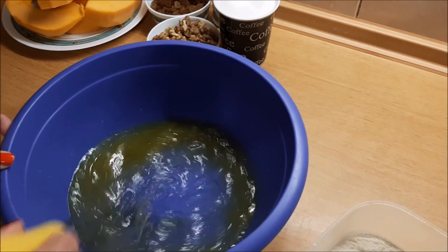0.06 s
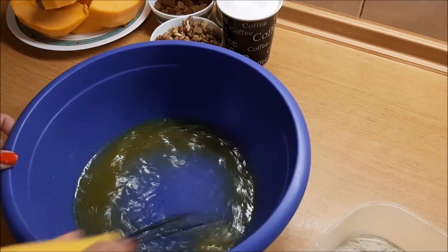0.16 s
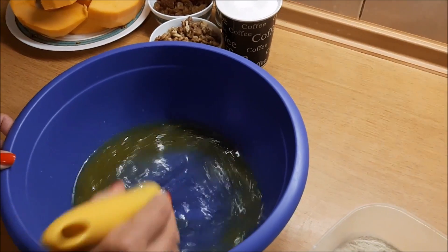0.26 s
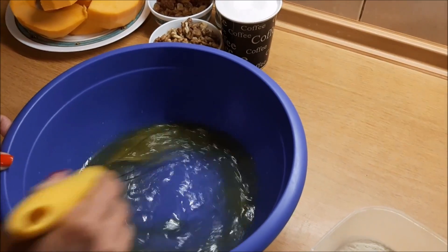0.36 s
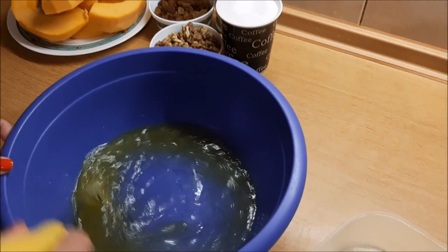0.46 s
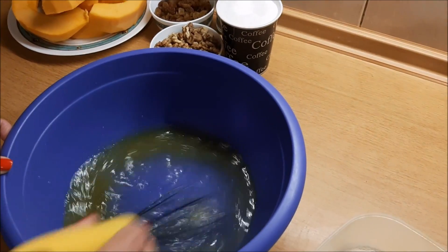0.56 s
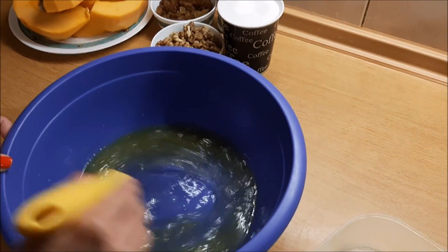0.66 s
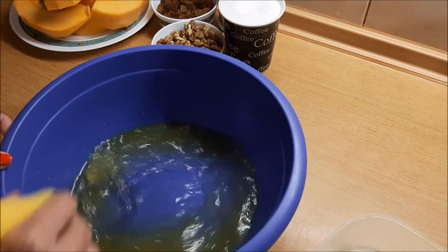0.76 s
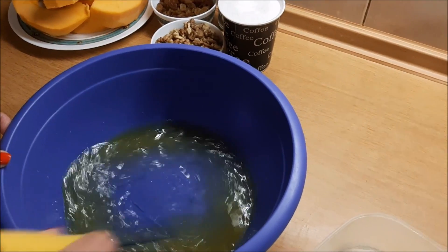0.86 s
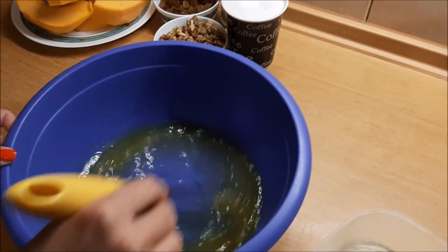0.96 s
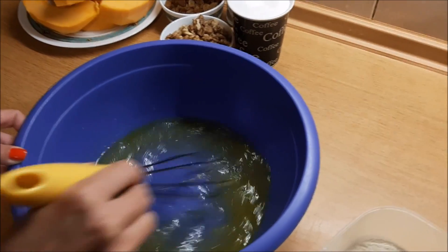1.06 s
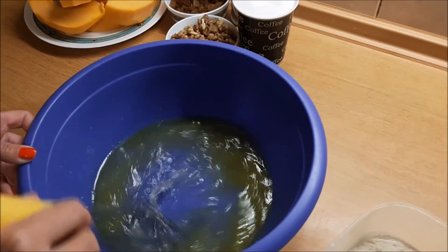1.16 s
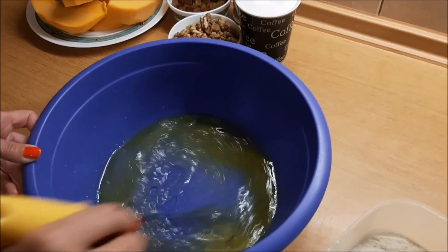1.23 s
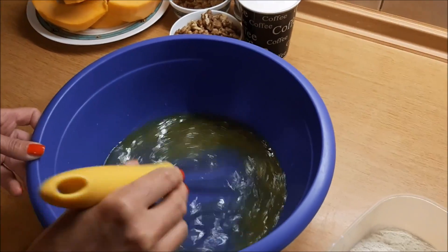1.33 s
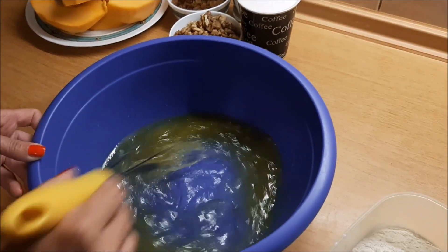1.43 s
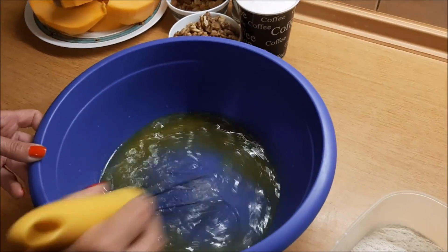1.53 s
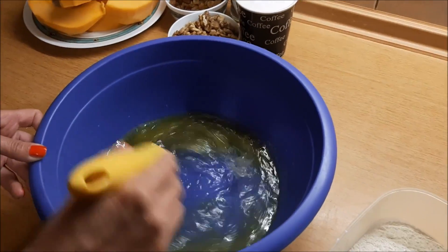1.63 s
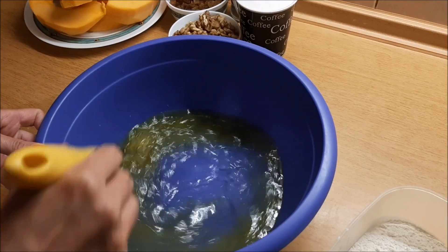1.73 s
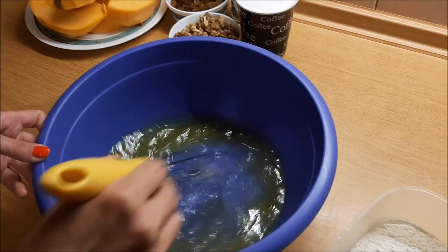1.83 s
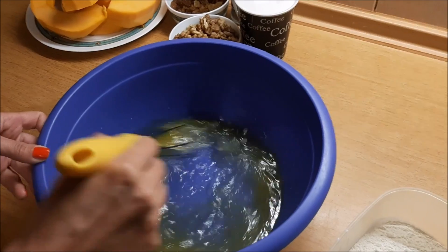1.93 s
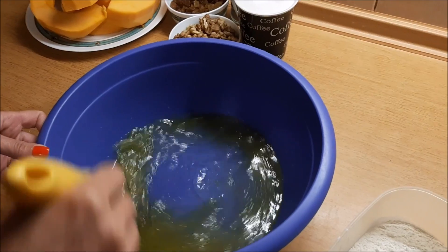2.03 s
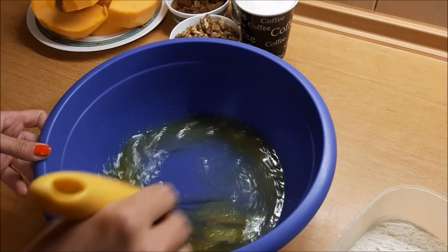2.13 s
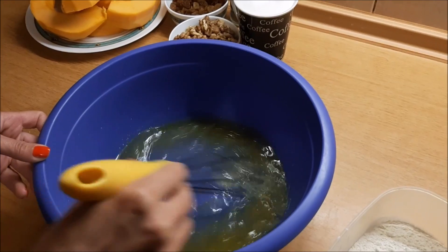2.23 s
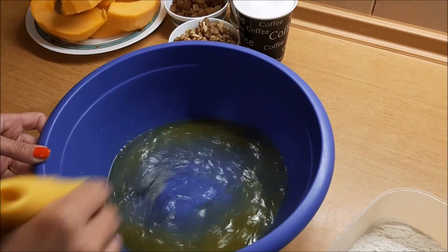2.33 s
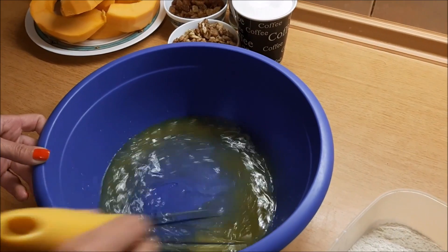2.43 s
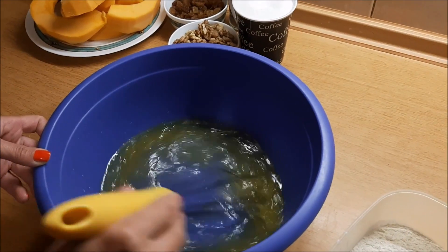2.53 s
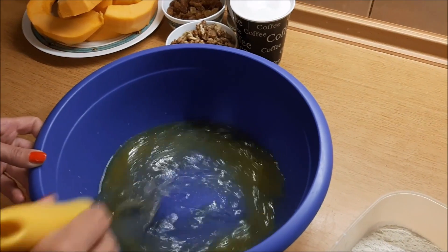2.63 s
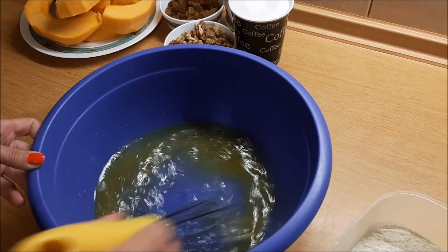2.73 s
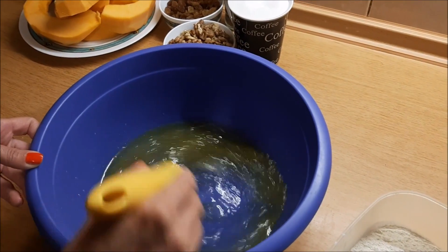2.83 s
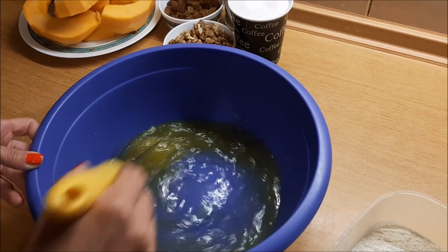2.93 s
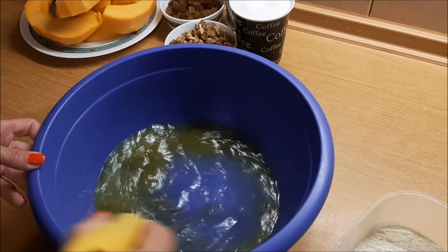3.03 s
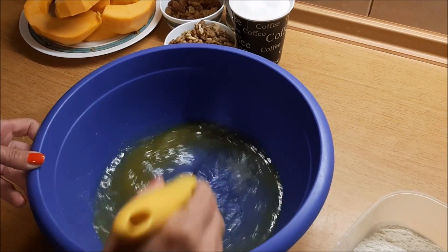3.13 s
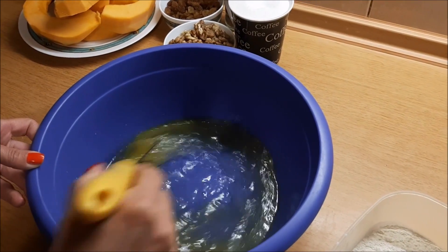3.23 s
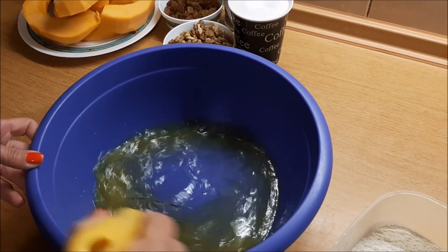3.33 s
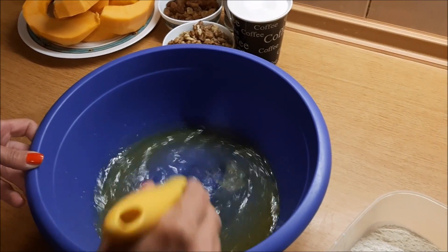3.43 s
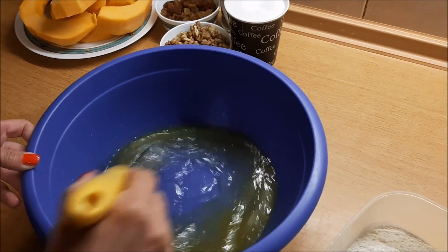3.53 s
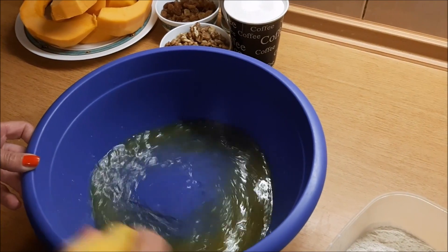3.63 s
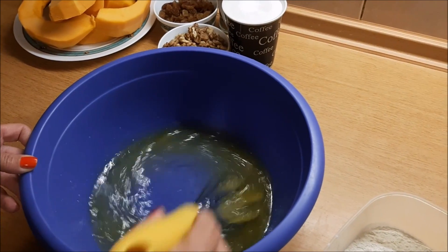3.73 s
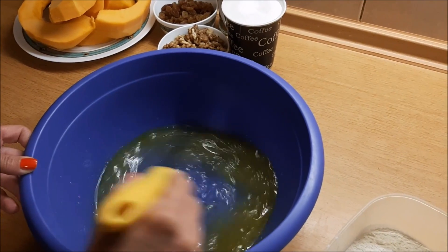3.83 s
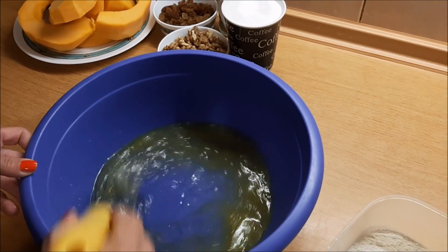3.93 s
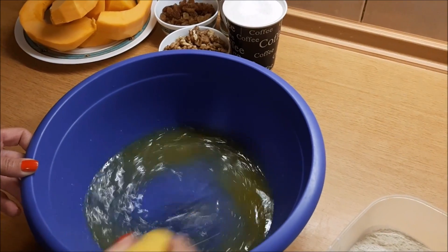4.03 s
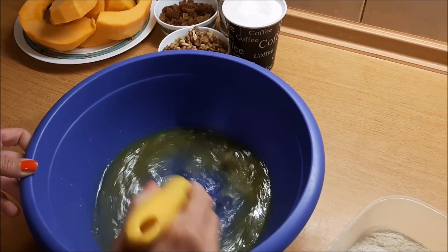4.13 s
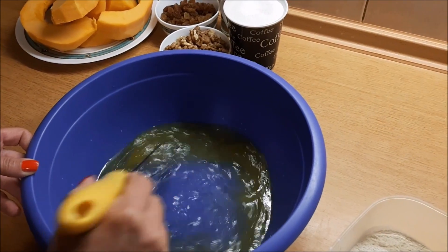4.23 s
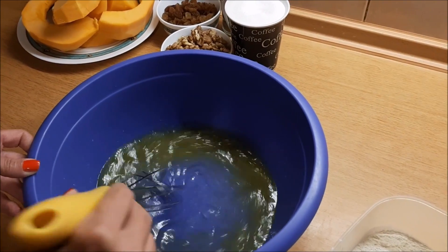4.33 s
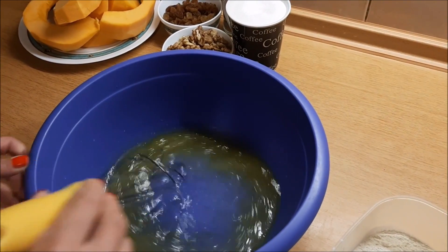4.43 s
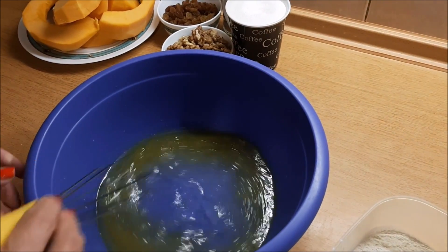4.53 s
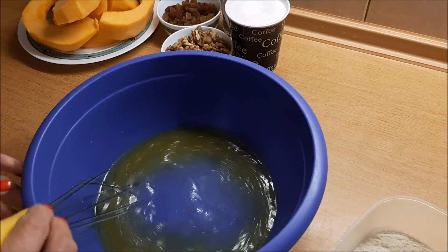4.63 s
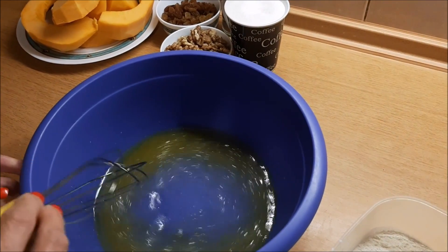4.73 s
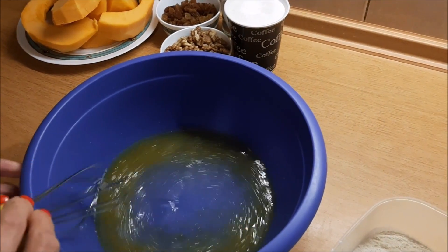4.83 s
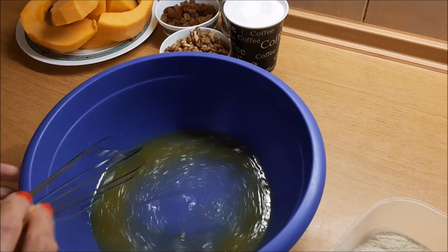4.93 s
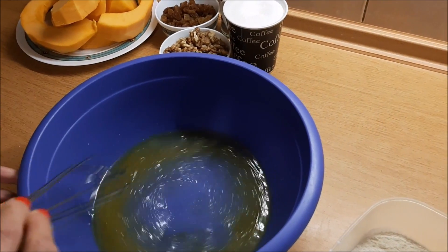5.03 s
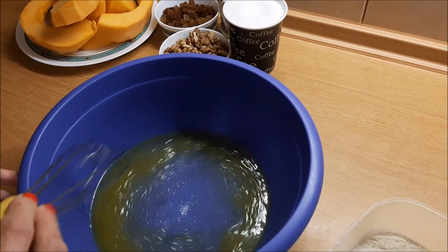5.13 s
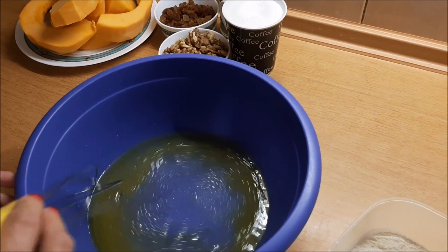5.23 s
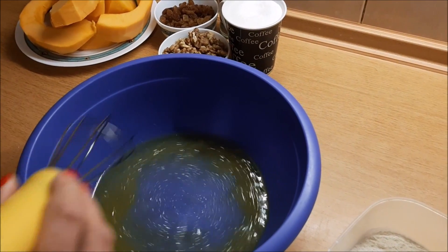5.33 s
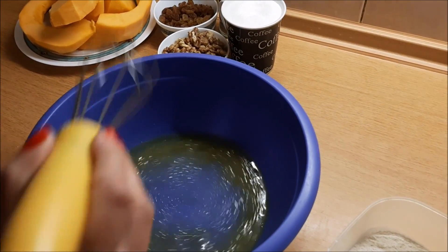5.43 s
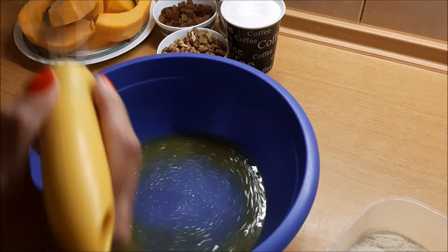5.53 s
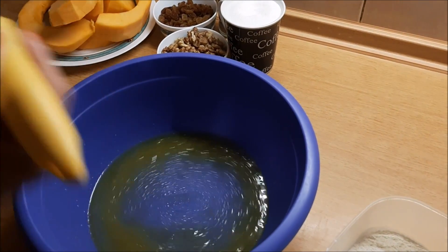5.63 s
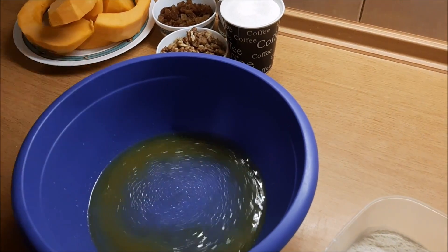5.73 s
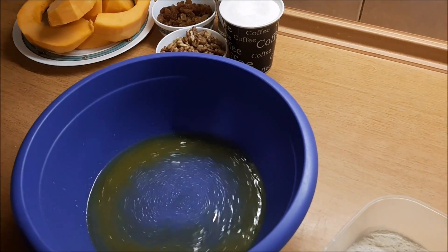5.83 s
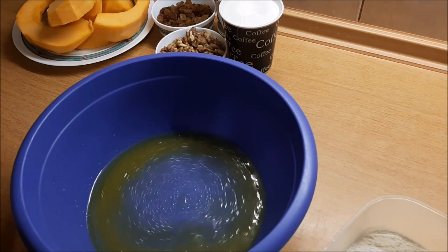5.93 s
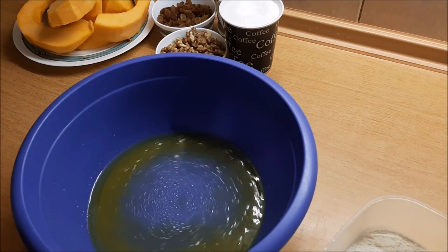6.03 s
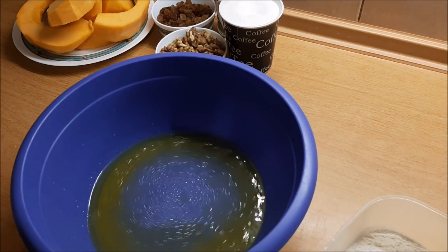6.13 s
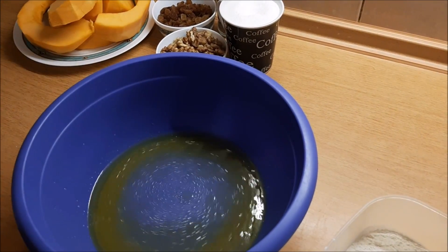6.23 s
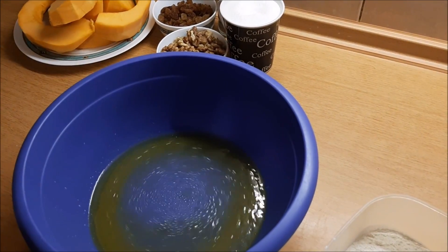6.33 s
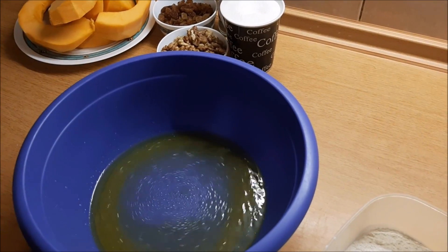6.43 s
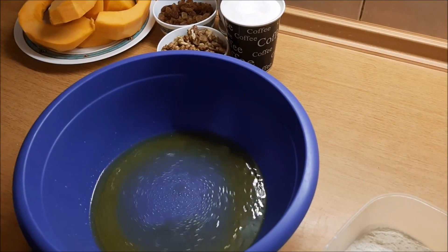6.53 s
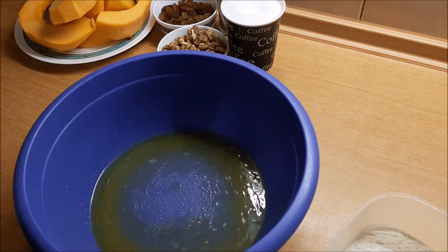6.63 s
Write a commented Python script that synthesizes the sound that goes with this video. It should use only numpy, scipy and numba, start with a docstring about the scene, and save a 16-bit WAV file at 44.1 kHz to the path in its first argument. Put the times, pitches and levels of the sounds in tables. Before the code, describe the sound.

A wire whisk rapidly beats thin egg in a plastic bowl, wires clacking on the wall, then four taps on the rim and soft set-down bumps.

```python
"""Whisk in a plastic bowl

A wire whisk beats a thin egg mixture on a kitchen worktop, heard close up: sprays of short damped sines give
tearing films and bubbles, stick-slip grains excite the bowl's modes, and noise bursts and modes give knocks.
The whisk is then tapped four times on the rim and set aside with a rustle, wire notes and soft bumps.
Close reflections and a small room's tail surround it all; low noise and a faint mains hum remain."""
import sys
import numpy as np
from scipy import signal
from scipy.fft import rfft, irfft
from scipy.io import wavfile
from scipy.ndimage import uniform_filter1d
from numba import njit

SR = 44100
rng = np.random.default_rng(int(sys.argv[2]) if len(sys.argv) > 2 else 0)


def inscribe(sig):
    """Save sig as 16-bit PCM at rate SR to the path in sys.argv[1].

    A 1-D sig is mono; a 2-D sig holds one channel per row.
    Samples are clipped to [-1, 1] before scaling.
    """
    pcm = np.round(np.clip(np.atleast_2d(sig).T, -1, 1) * 32767)
    wavfile.write(sys.argv[1], SR, pcm.astype(np.int16))


N = 294147
TIME = np.arange(N) / SR


def undb(db):
    """Level law: decibels to amplitude gain."""
    return 10 ** (np.asarray(db) / 20)


def unit(x):
    """Normalisation: scale to rms 1."""
    return x / np.sqrt(np.mean(x ** 2))


def add(out, s, sound):
    """Superposition: mix a sound in at time s in seconds."""
    start = int(s * SR)
    out[:, start:start + sound.shape[1]] += sound[:, :N - start]


def convolve(x, response):
    """Linear filtering: pass a stereo sound through an impulse response."""
    return signal.fftconvolve(x, np.atleast_2d(response), axes=1)[:, :x.shape[1]]


def band_pass(x, low_hz, high_hz, order=2):
    """Band-pass filtering: keep the range between two frequencies."""
    return signal.sosfilt(signal.butter(order, (low_hz, high_hz), "band", fs=SR, output="sos"), x)


def high_pass(x, low_hz, order):
    """High-pass filtering: keep what lies above one frequency."""
    return signal.sosfilt(signal.butter(order, low_hz, "high", fs=SR, output="sos"), x)


def log_bins(count):
    """Logarithmic pitch scale: log frequency of each spectrum bin."""
    return np.log(np.fft.rfftfreq(count, 1 / SR) + 1)


def colour(x, points, size=4096):
    """Minimum-phase filtering: a causal filter of the given (Hz, dB) shape, by way of the cepstrum."""
    hz, db = np.transpose(points)
    log_gain = np.log(undb(np.interp(log_bins(size), np.log(hz), db)))
    cepstrum = irfft(log_gain)[:size // 2]
    cepstrum[1:] *= 2
    return convolve(x, irfft(np.exp(rfft(cepstrum, size))))


def fade(t, t60):
    """Exponential decay: from t = 0, falling 60 dB in t60 seconds."""
    return (t >= 0) * np.exp(-np.log(1000) * np.abs(t) / t60)


def noise(count, apart_hz=1150):
    """Interchannel coherence: white stereo noise, alike in the bass and unrelated in the treble."""
    mid, side = rfft(rng.standard_normal((2, count)))
    likeness = .93 / (1 + (np.fft.rfftfreq(count, 1 / SR) / apart_hz) ** 3)
    opposed = np.array([[1], [-1]]) * side
    return unit(irfft(mid * np.sqrt(1 + likeness) + opposed * np.sqrt(1 - likeness), count))


def ring(modes, t, width_hz=1300, uneven_db=4.0):
    """Modal synthesis: damped sines, unevenly excited; the channels go out of step with rising pitch."""
    out = 0
    for hz, db, t60 in modes:
        side = rng.choice([-1, 1]) * np.array([[1], [-1]])
        skew = side * min(hz / width_hz, 1) ** 2 * np.pi / 4
        detune = 1 + 0.0058 * rng.standard_normal()
        phase = 2 * np.pi * (hz * t * detune + rng.random())
        level = undb(db + uneven_db * rng.uniform(-2.2, 1))
        out = out + level * fade(t, t60) * np.sin(phase + skew)
    return out


@njit
def ping(starts, hz, cycles, sizes, glide):
    """Granular synthesis: one softly started damped sine per grain, rising in pitch by the share glide."""
    out = np.zeros(N)
    for k in range(len(hz)):
        length, first = cycles[k] * SR / hz[k], int(starts[k]) + 1
        step = 2 * np.pi * hz[k] / SR
        phase = step * (first - starts[k])  # starts fall between samples
        for i in range(min(int(length), N - first)):
            envelope = min(12 * (i + 1) / length, 1.) * np.exp(-5.8 * i / length)
            out[first + i] += sizes[k] * envelope * np.sin(phase)
            phase += step * (1 + glide * i / length)
    return out


def grains(rate, low_hz, high_hz, cycles, scatter_db, glide, lag_s):
    """Stochastic grain shower: rate per second, random pitch, life and size, each with its channel lag."""
    when, pitch, life, size, place = rng.random((int(rate * N / SR), 5)).T
    starts = (np.arange(len(when)) + 2 * when) * SR / rate
    sizes = undb(-scatter_db * np.log(size + .015))
    lag = (2 * place - 1) * lag_s * SR / 2
    hz = low_hz * (high_hz / low_hz) ** pitch
    lives = cycles * (.5 + life)
    return unit(np.array([ping(np.abs(starts + way * lag), hz, lives, sizes, float(glide)) for way in (-1, 1)]))


def flutter(rate, depth_db):
    """Amplitude modulation: a gain wandering between random values, rate of them per second."""
    steps = rng.standard_normal(2048)
    return undb(depth_db * np.interp(TIME * rate, np.arange(len(steps)), steps))


def waver(x, rate, shift_s):
    """Doppler shift: a drifting delay moves the resonances up and down, as when liquid climbs the wall."""
    wander = np.log(flutter(rate, 20 / np.log(10)))  # the random values themselves, without the gain law
    drift = uniform_filter1d(wander, SR // 30)
    return np.array([np.interp(TIME + shift_s * drift, TIME, channel) for channel in x])


def hollow(x, echo_db=1, t60=0.028):
    """Cavity reverberation: dense echoes in the bowl, their resonances shifted by moving hand and liquid."""
    t = TIME[:SR // 10]
    echoes = unit(noise(len(t)) * fade(t - .001, t60)) / np.sqrt(len(t))
    inside = waver(convolve(x, echoes), rate=4, shift_s=.002)
    return (x + undb(echo_db) * inside) / np.hypot(1, undb(echo_db))


def favour(x, hz, db, q=7):
    """Resonance: lift one narrow band."""
    return x + (undb(db) - 1) * signal.lfilter(*signal.iirpeak(hz, q, fs=SR), x)


# Spectrum of the room noise; its base level in dB is set by quiet(). Each row of the spectrum: frequency in Hz,
# relative level in dB.
QUIET_NOISE = [(15, -53.5), (25, -26.5), (64, -26.5), (97, -2.5), (166, -20), (200, -0.5), (223, -15.5),
               (344, -18), (384, -18.5), (775, -38), (1890, -36), (16000, -42)]
# Partials of the mains hum. Each row: frequency in Hz, rms level in dB.
HUM = [(99, -76), (200, -82.5), (300, -82)]


def quiet(noise_db=-67):
    """Stationary background: filtered low room noise plus the steady sines of an appliance's hum."""
    hum = 0
    for hz, db in HUM:
        hum = hum + np.sqrt(2) * undb(db) * np.sin(2 * np.pi * (hz * TIME + rng.random()))
    return hum + unit(colour(noise(N), QUIET_NOISE)) * undb(noise_db)


# Reverberation time of the room. Each row: frequency in Hz, 60 dB decay time in seconds.
ROOM_T60 = [(100, 0.3), (500, 0.52), (2000, 0.59), (6000, 0.43), (14000, 0.26)]


def kitchen(dry, early_db=-11, late_db=-13):
    """Room reverberation: close reflections from bowl and worktop, then the tail of a small tiled room."""
    t = TIME[:SR * 3 // 5]
    hz, t60 = np.transpose(ROOM_T60)
    spectrum, log_hz = rfft(noise(len(t))), log_bins(len(t))
    late = 0
    for share, decay in zip(np.eye(len(hz)), t60):  # each band dies at its own pace
        band = irfft(spectrum * np.interp(log_hz, np.log(hz), share), len(t))
        late = late + band * fade(t - .012, decay)
    early = noise(len(t)) * fade(t - .002, t60=0.074)
    return convolve(dry, (undb(early_db) * unit(early) + undb(late_db) * unit(late)) / np.sqrt(len(t)))


# The whisk sliding as it is set aside. Each row: start in seconds, length in seconds, relative level in dB.
SLIDES = [(6.025, 0.08, -71.5), (6.162, 0.028, -65), (6.228, 0.27, -77), (6.495, 0.21, -53.5)]


def sliding(attack_s=0.018, release_t60=0.25):
    """Envelope shaping: each slide starts quickly, holds and dies away."""
    gain = 0
    for s, length, db in SLIDES:
        attack = np.clip((TIME - s) / attack_s, 0, 1)
        gain = gain + undb(db) * attack * fade(np.maximum(TIME - s - length, 0), release_t60)
    return gain


def squeak(hz, db, t, width=0.05):
    """Narrow-band friction noise: a rubbed wire gives a short, rough note."""
    note = band_pass(noise(len(t)), hz * (1 - width), hz * (1 + width))
    return undb(db) * unit(note) * fade(t, t60=0.14)


# Modes of the free wire loops. Each row: frequency in Hz, relative level in dB, 60 dB decay time in seconds.
WIRES = [(1335, -2.5, 0.18), (1370, -4, 0.17), (1464, -3.5, .18), (1670, -1, 0.27), (1780, -11.5, 0.34),
         (1870, -6, .35), (1930, -3, 0.2), (2062, -4.5, 0.24), (2070, -4, 0.31), (2400, -2.5, 0.15),
         (2790, -7.5, 0.091), (3150, -9.5, 0.14), (3490, -7.5, 0.092), (3784, -10.5, 0.089),
         (4100, -11.5, 0.076), (4755, -15, 0.067), (4950, -14.5, 0.046), (5570, -16, 0.1)]
# Modes of the worktop under the whisk. Each row: frequency in Hz, relative level in dB, decay time in seconds.
WORKTOP = [(352, 0, 0.1), (770, 3.5, 0.068), (1090, 0.5, 0.066), (1630, -3, .14), (1936, 1.5, 0.11),
           (3340, -19, 0.13)]
# Spectrum of the sliding rub. Each row: frequency in Hz, relative level in dB.
SLIDE_COLOUR = [(120, -34), (200, -12), (334, -6.5), (590, -12), (777, -11), (1400, -13), (1650, -9.5),
                (2130, -8.5), (11700, -20), (16000, -24)]
# Spectrum of a bump. Each row: frequency in Hz, relative level in dB.
BUMP_COLOUR = [(35, -42.5), (60, -18), (331, -6.5), (472, -11.5), (877, -1.5), (1200, -4), (1370, -13),
               (1950, -5.5), (2180, -21), (3390, -17), (3710, -21), (8610, -34), (12000, -31),
               (15600, -66.5), (22000, -120)]
# Loops brushing the worktop, one of them squeaking.
# Each row: start in seconds, relative brush level in dB, note in Hz, relative note level in dB.
BRUSHES = [(6.074, -74, 1730, -75), (6.181, -54, 1366, -59), (6.232, -66.5, 1780, -63),
           (6.275, -72, 1740, -69), (6.357, -67.5, 1680, -65)]
# Soft bumps on the worktop. Each row: start in seconds, relative level in dB.
BUMPS = [(6.112, -80), (6.544, -26.5), (6.553, -32.5), (6.601, -46), (6.637, -52), (6.66, -52)]


def set_aside():
    """Friction and impact: a light sliding rustle, faint wire notes and soft bumps on the worktop."""
    t = TIME[:SR // 5]
    rub = grains(rate=1300, low_hz=476.4, high_hz=16080, cycles=1.1, scatter_db=0.0, glide=0, lag_s=0.00071)
    rustle = unit(colour(rub + undb(9.0) * noise(N), SLIDE_COLOUR))
    out = rustle * sliding() * undb(1.5)
    for s, db, note_hz, note_db in BRUSHES:
        brush = unit(ring(WIRES, t) * fade(t, t60=0.092))
        add(out, s, undb(db - 19.0) * brush + squeak(note_hz, note_db, t))
    for s, db in BUMPS:
        thud = fade(t, t60=0.1) * unit(colour(noise(len(t)), BUMP_COLOUR))
        bump = thud + undb(-9.0) * ring(WORKTOP, t, uneven_db=6.5)
        add(out, s, undb(db) * np.minimum(t / 0.0031, 1) * bump)
    return out


STOP_S = 4.264  # the hand stops beating


def swirl(dying_db_per_s):
    """Viscous decay: the liquid circles steadily while the hand beats, then comes to rest."""
    return undb(-dying_db_per_s * np.maximum(TIME - STOP_S, 0))


# Spectrum of a drop hitting the wall. Each row: frequency in Hz, relative level in dB.
FOAM_COLOUR = [(1000, -29), (4000, -0.5), (7000, -1.5), (12000, -2), (16000, -5)]
# Drops flicked against the dry wall. Each row: start in seconds, relative level in dB.
DROPS = [(0.1645, -41), (0.2508, -37), (0.8315, -31), (1.085, -35.5), (1.326, -32), (2.443, -23.5),
         (2.9796, -22), (3.3448, -27), (3.763, -34), (4.0597, -33), (4.274, -28), (4.3487, -33.5),
         (4.358, -40), (4.4543, -43.5), (4.466, -49), (4.502, -50)]


def foam(foam_db=-64.5):
    """Bubble bursting: a shower of tiny high pops fading after the beating, and drops ticking on the wall."""
    t = TIME[:SR // 20]
    pops = grains(rate=500, low_hz=7500, high_hz=15500, cycles=14, scatter_db=5, glide=.05, lag_s=.0004)
    out = pops * flutter(rate=41, depth_db=6.5) * swirl(dying_db_per_s=51) * undb(foam_db)
    for s, db in DROPS:
        add(out, s, undb(db - 10) * unit(colour(noise(len(t)), FOAM_COLOUR)) * fade(t, t60=0.042))
    return out


# Single large bubbles. Each row: start in seconds, initial frequency in Hz, relative level in dB.
GURGLES = [(.135, 710, -33), (0.269, 559, -37), (0.291, 2540, -27), (.503, 2200, -37), (.514, 2640, -30.5),
           (.828, 1918, -18.5), (.95, 690, -31), (1.35, 1570, -26.5), (1.418, 834, -24.5),
           (1.468, 1014, -27), (1.49, 3136, -22), (1.527, 3110, -27), (1.726, 2206, -16.5),
           (2.017, 982, -25), (2.542, 494, -24.5), (2.96, 592, -24), (3.054, 2164, -26.5),
           (3.148, 3430, -24), (3.194, 1934, -24), (3.283, 3220, -20.5), (3.57, 2204, -21.5),
           (3.587, 2840, -24.5), (3.594, 971, -23.5), (3.66, 1000, -28), (3.681, 1002, -25.5),
           (3.755, 2010, -21.5), (4.012, 2200, -35)]


def gurgles(t60_s=0.12, rise_per_s=1.2):
    """Bubble resonance: large bubbles ring one by one, rising in pitch as they near the surface."""
    out, t = np.zeros((2, N)), TIME[:SR // 6]
    rising = t * (1 + rise_per_s * t / 2)  # running time ever faster raises the pitch
    for s, hz, db in GURGLES:
        note = ring([(hz, db, t60_s)], rising, uneven_db=1)
        add(out, s, note * np.minimum(t / 0.0022, 1))
    return out


# Lumps of liquid slapping down. Each row: start in seconds, initial centre in Hz, relative level in dB.
SPLASHES = [(.201, 2010, -23.5), (.398, 2260, -31), (.477, 2100, -29), (.519, 1050, -34.5),
            (.593, 730, -36), (.624, 1697, -33), (.736, 5150, -31), (.768, 1986, -26), (.770, 2930, -31),
            (1.172, 1730, -31), (1.184, 3980, -32), (1.267, 1920, -27.5), (1.386, 543, -31),
            (1.412, 2070, -28.5), (1.618, 2400, -35), (1.729, 1360, -30.5), (1.971, 4000, -27),
            (2.038, 594, -31), (2.111, 1810, -27), (2.267, 1920, -27), (2.494, 3580, -33.5),
            (2.630, 1980, -29.5), (2.968, 1970, -27), (3.020, 2070, -31), (3.149, 3800, -23),
            (3.158, 1700, -28), (3.268, 2130, -32), (3.286, 3300, -36), (3.762, 4330, -48),
            (3.958, 3320, -37), (3.995, 2100, -29), (4.160, 2320, -29), (4.236, 2110, -35)]


def splashes(width=0.086, rise_per_s=2.0, attack_s=0.0054, t60_s=0.061):
    """Cavity collapse: liquid slaps down and the pocket under it closes, so its rough note rises."""
    out, t = np.zeros((2, N)), TIME[:SR // 8]
    closing = t * (1 + rise_per_s * t / 2)
    envelope = np.minimum(t / attack_s, 1) * fade(np.maximum(t - attack_s, 0), t60_s)
    for s, hz, db in SPLASHES:
        rough = band_pass(noise(len(t)), hz / (1 + width), hz * (1 + width))
        splat = np.array([np.interp(closing, t, side) for side in rough]) * envelope
        add(out, s, undb(db) * unit(splat) * np.sqrt(np.mean(envelope ** 2)))
    return out


def strike(body, levels_db, rise_s, order=2, size=256):
    """Impact spectrum: a gradual onset, with set peak levels for the wall, wire and tick ranges."""
    body = body * np.minimum(TIME[:body.shape[1]] / rise_s, 1)
    wall = band_pass(body, 430, 1200, order + 1)
    wire = band_pass(body, 1300, 2400, order)
    tick = high_pass(body, 2900, 2 * order)
    out = 0
    for part, db in zip((wall, wire, tick), levels_db):
        peak = np.sqrt(uniform_filter1d(np.mean(part ** 2, axis=0), size).max())
        out = out + undb(db) * part / peak
    return out


# Spectrum of wires rattling on plastic. Each row: frequency in Hz, relative level in dB.
CRACK_COLOUR = [(60, -33), (200, -10), (400, -15.5), (600, -13.5), (1000, 1), (2000, -5.5), (2700, -2),
                (3600, -6), (6000, -10.5), (8500, -17), (16000, -22.5)]


def crack(t, t60):
    """Contact noise: a short burst of wires rattling against plastic."""
    return unit(colour(noise(len(t)), CRACK_COLOUR)) * fade(t, t60)


# Modes of the wet bowl with the whisk pressed on it.
# Each row: frequency in Hz, relative level in dB, 60 dB decay time in seconds.
BOWL = [(501.5, -12.5, 0.047), (586, -12, 0.0091), (754, -15, 0.044), (964, -6.5, 0.078),
        (1020.5, -2, 0.13), (1520, -9.5, 0.02), (1625, 4, 0.027), (1840, 2, 0.031), (1962, -1.5, 0.029),
        (2024, -0.5, 0.073), (2140, 1.5, 0.021), (2470, -9, 0.0047), (3230, -6.5, 0.0054),
        (4130, -12, 0.028)]
# Spectrum of the swaying bowl. Each row: frequency in Hz, relative level in dB.
SWAY_COLOUR = [(25, -22), (50, -14.5), (75, -20), (100, 1), (120, -8.5), (145, 4), (172, -6.5), (200, 3.5),
               (260, -2.5), (330, 2.5), (400, 0), (600, -24), (2000, -52)]
# Treble balance of a knock in the liquid. Each row: frequency in Hz, gain in dB.
WET_COLOUR = [(3000, 2.5), (6000, 2.5), (9000, 1), (16000, -1)]
# Wires knocking on the wall. Each row: start in seconds, relative wall, wire and tick levels in dB.
WALL_KNOCKS = [(0.102, -23.5, -24, -47), (.1652, -23.5, -14, -25), (.248, -19, -18.5, -27),
               (0.44, -41, -22, -24), (0.778, -36, -37, -16.5), (0.8137, -22, -19.5, -34),
               (0.957, -24, -27, -38.5), (1.286, -13.5, -11.5, -26.5), (1.297, -20.5, -16, -57),
               (1.326, -23, -18, -21), (1.726, -29, -39, -25), (1.907, -25.5, -18, -26),
               (1.974, -30.5, -45, -29), (2.213, -36, -19, -42), (2.317, -30, -22, -27.5),
               (2.442, -39, -18.5, -27.5), (2.531, -16.5, -14, -28.5), (2.542, -20.5, -29.5, -25),
               (2.677, -32.5, -30.5, -25), (2.787, -43, -20, -27), (2.906, -31.5, -23.5, -30),
               (2.958, -41, -34, -26), (3.139, -26, -19, -24.5), (3.462, -31, -25, -35),
               (4.123, -28.5, -24, -30), (4.21, -26.5, -33, -29), (4.421, -49, -37, -51.5),
               (4.823, -72.5, -46.5, -55)]


def knocks():
    """Damped impact: wires hit the wall, the liquid damps the ring and the bowl gives a dull thud."""
    out, t = np.zeros((2, N)), TIME[:SR // 5]
    # a firm knock reaches the wall's low modes, a glancing one only ticks
    for s, *levels_db in WALL_KNOCKS:
        body = ring(BOWL, t) + undb(-1.5) * colour(crack(t, t60=0.048), WET_COLOUR)
        add(out, s, strike(body, levels_db, rise_s=0.0012))
        thud = unit(colour(noise(len(t)), SWAY_COLOUR)) * fade(t, t60=0.21)
        add(out, s, undb(levels_db[0] - 24.0) * thud)
    return out * undb(-4.0)


def rim_contact(t, wire_db, lower_hz, upper_hz, overtone_hz, overtone_db):
    """Selective modal excitation: the rim damps the loops at once and its contact point favours some modes."""
    modes = [(lower_hz, 7, .07), (upper_hz, 8, .06), (overtone_hz, overtone_db - 14, .06)]
    favoured = ring(modes, t, uneven_db=0)
    loops = favoured + ring(WIRES, t, uneven_db=2) * fade(t, t60=.07)
    snap = colour(crack(t, t60=0.06), [(2200, -9), (5500, 0)])
    body = undb(wire_db + 13) * snap + undb(-17) * ring(BOWL, t) + loops
    return favour(body, overtone_hz, overtone_db)


def rattle(out, s, db):
    """Repeated impact: the loops clatter ever more weakly, their modes retuned each time."""
    t = TIME[:SR // 10]
    for delay in .012 + .011 * (np.arange(6) + rng.random(6)):
        burst = crack(t, t60=0.016)
        loops = ring(WIRES, t * rng.uniform(.92, 1.08), uneven_db=6) * fade(t, t60=.045)
        add(out, s + delay, undb(db) * fade(delay, t60=0.18) * (burst + undb(-4) * loops))


# Spectrum of the tap sent into the room. Each row: frequency in Hz, relative level in dB.
CLINK_COLOUR = [(300, -24), (900, -3), (1200, -11), (1450, -3), (2050, 3), (2700, -2), (3500, -5.5),
                (6000, -14), (8500, -15.5), (16000, -22)]
# Spectrum of the rocking bowl. Each row: frequency in Hz, relative level in dB.
THUMP_COLOUR = [(25, -41), (55, -24), (85, 2.5), (160, -2.5), (240, -4), (350, -10), (550, -4.5), (900, 1),
                (2000, -37)]
# Spectrum of the drops shaken off. Each row: frequency in Hz, relative level in dB.
DROP_COLOUR = [(200, -26), (900, -9), (2000, 0.5), (4500, -5.5), (7600, -1), (8800, -15.5), (16000, -14)]
# Whisk tapped on the rim. Each row: start in seconds, wall, wire and tick peak levels in dB, relative thump
# level in dB, thump delay in seconds, rebound delay in seconds, rebound level in dB relative to the tap,
# rattle level in dB relative to the wires, relative drops level in dB, rim note in Hz, relative note level
# in dB, favoured lower and upper wire modes in Hz, favoured overtone in Hz, overtone lift in dB.
TAPS = [(4.6318, -29, -15.5, -23.5, -40, 0.025, 0.032, -13, -17.5, -48.5, 938, -26.5, 1328, 2007, 5050, 8.5),
        (4.8609, -24.5, -15, -24, -46, 0.014, 0.021, -19, -22.5, -51, 968, -24.5, 1430, 1986, 3740, 4.5),
        (5.0423, -26, -13, -15.5, -37, .004, 0.0081, -1.5, 5, -49, 1030, -36, 1490, 1946, 3444, 6),
        (5.231, -21.5, -12, -18, -36.5, 0.017, 0.026, -14.5, -0.5, -36, 933, -33, 1404, 1866, 4400, 3.3)]


def taps():
    """Impact and radiation: whisk hits rim, rebounds, rattles; returns the near sound and the room's share."""
    out, spill, t, shiver = np.zeros((2, N)), np.zeros((2, N)), TIME[:SR // 2], 0
    for (s, wall_db, wire_db, tick_db, thump_db, thump_s, rebound_s, rebound_db, rattle_db, drops_db,
         rim_hz, rim_db, lower_hz, upper_hz, overtone_hz, overtone_db) in TAPS:
        for delay, db in ((0, 0), (rebound_s, rebound_db)):
            body = rim_contact(t, wire_db, lower_hz, upper_hz, overtone_hz, overtone_db)
            add(out, s + delay, undb(db) * strike(body, (wall_db, wire_db, tick_db), rise_s=0.0061))
            # the whole bowl radiates the tap into the room
            clink = unit(colour(noise(len(t)), CLINK_COLOUR)) * fade(t, t60=.05)
            add(spill, s + delay, undb(db + wire_db - 4) * clink)
        rim_note = ring([(rim_hz, rim_db, .075)], t, uneven_db=-5.5)
        add(out, s, rim_note * np.minimum(t / 0.0021, 1))
        rattle(out, s, wire_db + rattle_db)
        shiver = shiver + undb(wire_db - 31) * fade(TIME - s, t60=.55)
        # the bowl gives way slowly, so its thump comes late
        rocking = (1 - np.exp(-t / 0.0044)) ** 2 * fade(t, t60=0.24)
        thump = rocking * unit(colour(noise(len(t)), THUMP_COLOUR))
        add(out, s + thump_s, undb(thump_db + 7.5) * thump)
        # drops shaken off the wires patter down in a short shower
        uneven = undb(4.7 * rng.standard_normal(len(t)))
        patter = unit(colour(noise(len(t)) * uneven, DROP_COLOUR))
        add(out, s, undb(drops_db) * patter * np.exp(-((t - .055) / 0.025) ** 2))
    # the shivering loops keep touching and give a faint, uneven chatter
    chatter = grains(rate=220, low_hz=1500, high_hz=2250, cycles=70, scatter_db=3.5, glide=0, lag_s=.0004)
    out = out + shiver * chatter
    return out, spill + colour(out, [(500, 0), (1200, -9), (7000, -9), (10000, -4)])


# Sweeps of the whisk through the liquid. Each row: time of fastest motion in seconds, nominal length in
# seconds, relative spray, scrape and slosh levels in dB.
SWEEPS = [(0.01, 0.07, -37.5, -33.5, -33), (0.139, 0.18, -37, -33.5, -57), (0.26, 0.15, -42.5, -36, -33.5),
          (0.339, 0.081, -38, -39.5, -40), (0.448, 0.15, -34.5, -32.5, -36.5),
          (0.622, 0.069, -34, -33, -38.5), (0.744, .11, -30.5, -29.5, -32.5),
          (0.829, 0.038, -37, -38.5, -39.5), (0.952, 0.069, -40.5, -29.5, -35.5),
          (1.033, 0.15, -45, -41.5, -37.5), (1.188, 0.063, -31, -27.5, -47),
          (1.298, 0.16, -39, -35.5, -39.5), (1.471, 0.14, -32, -29.5, -37.5),
          (1.612, 0.055, -31, -31, -34.5), (1.726, 0.15, -32, -27, -36.5), (1.894, 0.038, -29, -32.5, -30),
          (1.996, 0.1, -29, -30, -34.5), (2.091, 0.043, -33.5, -31.5, -36.5), (2.24, 0.16, -36, -30.5, -34),
          (2.364, 0.14, -34, -34, -46), (2.518, 0.12, -37.5, -29.5, -37), (2.663, 0.15, -35, -30.5, -39.5),
          (2.787, 0.14, -39, -40, -40), (2.951, 0.19, -34, -30, -35.5), (3.166, 0.094, -30, -25.5, -33),
          (3.28, 0.063, -29, -30.5, -31), (3.354, 0.037, -42.5, -29, -58),
          (3.45, 0.05, -36.5, -30.5, -40.5), (3.574, 0.18, -34, -29, -33.5), (3.755, 0.06, -34.5, -32, -41),
          (3.825, 0.12, -40, -32.5, -38), (3.965, .12, -35.5, -30.5, -34),
          (4.106, 0.058, -33.5, -34.5, -38), (4.189, 0.19, -37.5, -33, -46), (4.264, 0.16, -43, -34, -36)]


def sweeps(column, lag_s, stretch, swell_share=0.52, edge_db=9.5, roundness=2):
    """Power summation: one layer's gain, swelling as the wires speed up and falling as they leave the liquid."""
    power = 0
    for s, length, *levels_db in SWEEPS:
        along = (TIME - s - lag_s) / (length * stretch)
        away = np.maximum(-along / swell_share, along / (1 - swell_share))  # 1 at either end of the sweep
        power = power + undb(levels_db[column] - edge_db * np.abs(away) ** roundness) ** 2
    return np.sqrt(power)


def efforts():
    """Energy addition: spray, scrape and slosh strengths, sweeps plus steady swirl; the slosh lags the wires."""
    spray = np.hypot(sweeps(column=0, lag_s=0, stretch=0.94), undb(-54.5) * swirl(dying_db_per_s=105.0))
    scrape = np.hypot(sweeps(column=1, lag_s=0, stretch=1.15), undb(-43.5) * swirl(dying_db_per_s=220))
    slosh = np.hypot(sweeps(column=2, lag_s=0.0089, stretch=1.33), undb(-40.5) * swirl(dying_db_per_s=147.0))
    return spray, scrape, slosh


def blobs(x, rate=45, depth_db=2.9, count=14):
    """Band-wise modulation: sheets of liquid open and close, so neighbouring pitches flare up at random."""
    centres = np.linspace(np.log(1200), np.log(15000), count)
    log_hz, spectrum = log_bins(N), rfft(x)
    out = 0
    for share in np.eye(count):
        band = irfft(spectrum * np.interp(log_hz, centres, share), N)
        out = out + band * flutter(rate, depth_db)
    return unit(out)


def grazes():
    """Impulse excitation of modes: single wires touch the wall lightly and at random."""
    touches = grains(rate=30, low_hz=1200, high_hz=4500, cycles=2.5, scatter_db=2.4, glide=0, lag_s=.0004)
    wall = unit(convolve(touches, ring(BOWL, TIME[:SR // 8], uneven_db=1.5)))
    return wall + undb(-4.5) * hollow(touches)


def rubbed_wall(slips):
    """Moving excitation: wires travel round the wall, so groups of modes fluctuate and slide with the liquid."""
    t, out = TIME[:SR // 8], 0
    for k in range(5):
        group = convolve(slips, ring(BOWL[k::5], t, uneven_db=0))
        out = out + waver(group, rate=9, shift_s=.0038) * flutter(rate=16, depth_db=4.5)
    return unit(out)


# Spectrum of the spray. Each row: frequency in Hz, relative level in dB.
SPRAY_COLOUR = [(400, -39.5), (1500, -1.5), (2700, -7.5), (3400, -2.5), (4800, -3.5), (6500, -9),
                (8300, -11), (11000, -10), (16000, -11)]
# Spectrum of the slosh. Each row: frequency in Hz, relative level in dB.
SLOSH_COLOUR = [(40, -59.5), (150, -7), (410, -24.5), (480, -5), (620, -0.5), (880, -1.5), (1020, 3),
                (1200, -9.5), (1700, -9.5), (3000, -33)]
# Spectrum of the scrape. Each row: frequency in Hz, relative level in dB.
SCRAPE_COLOUR = [(60, -31), (250, -6), (480, -6), (2300, -1), (3000, 0), (8000, -15.5)]


def beating():
    """Film rupture, bubble resonance and stick-slip friction: spray, bubbles, scraping wires and swaying bowl."""
    spray_effort, scrape_effort, slosh_effort = efforts()
    wires_passing = flutter(rate=90, depth_db=1.5)
    # films of liquid snap behind each wire and leave tiny bubbles
    crackle = grains(rate=4500, low_hz=2360, high_hz=7300, cycles=5, scatter_db=4.2, glide=0, lag_s=.0004)
    mist = grains(rate=3000, low_hz=7000, high_hz=16000, cycles=3, scatter_db=4, glide=0, lag_s=.0004)
    mist = mist * flutter(rate=18, depth_db=1.5)
    fizz = grains(rate=750, low_hz=2300, high_hz=7000, cycles=56, scatter_db=3.4, glide=.12, lag_s=.0004)
    spray = blobs(colour(crackle + undb(-4.5) * mist + fizz, SPRAY_COLOUR)) * spray_effort * undb(1.5)
    # larger pockets of air are folded under and ring
    bubbles = grains(rate=380, low_hz=440, high_hz=1400, cycles=25, scatter_db=2.5, glide=.13, lag_s=.00019)
    slosh = unit(waver(colour(bubbles, SLOSH_COLOUR), rate=7, shift_s=.004)) * slosh_effort * undb(-4.0)
    blips = grains(rate=260, low_hz=1200, high_hz=3000, cycles=44, scatter_db=2.8, glide=.11, lag_s=.0004)
    # the wires stick and slip on the plastic
    slips = grains(rate=700, low_hz=1420, high_hz=2930, cycles=6.7, scatter_db=2.5, glide=0, lag_s=.00034)
    rubbing = rubbed_wall(slips) + undb(-6.0) * blips + undb(-9.0) * slips + undb(-10.5) * grazes()
    scrape = colour(rubbing, SCRAPE_COLOUR) * scrape_effort * undb(-2.0)
    sway = unit(colour(noise(N), SWAY_COLOUR)) * slosh_effort * flutter(rate=33, depth_db=2.5) * undb(-18)
    return hollow(spray * wires_passing) + scrape * wires_passing + slosh + sway


def scene():
    """Superposition of direct and reverberant sound: everything on the worktop, heard in the room."""
    dry = beating() + splashes() + gurgles() + foam() + knocks() + set_aside()
    near, spill = taps()
    return dry + near + kitchen(dry + spill) + quiet()


def record(dry, order=2):
    """Band limiting: drop the rumble, clip at full scale and cut the top above 16.2 kHz."""
    lean = high_pass(dry, 45, order)
    top_cut = signal.ellip(10, .2, 70, 16200, fs=SR, output="sos")
    return signal.sosfilt(top_cut, np.clip(lean, -1, 1))


dry = scene()
out = record(dry)
inscribe(out)
```